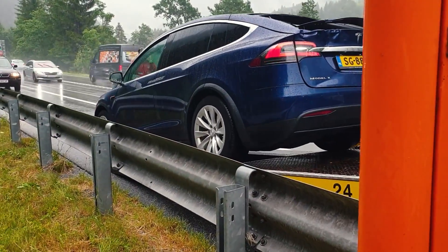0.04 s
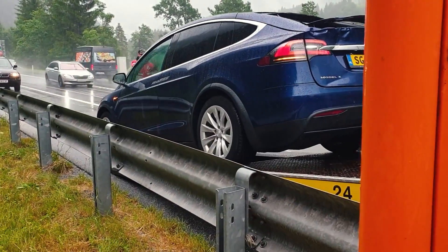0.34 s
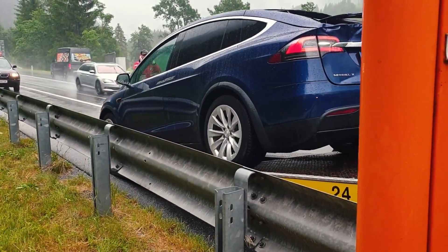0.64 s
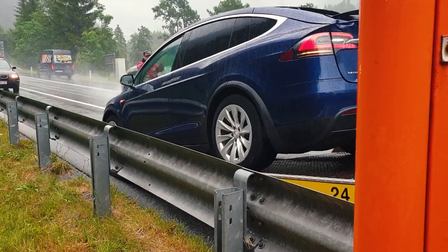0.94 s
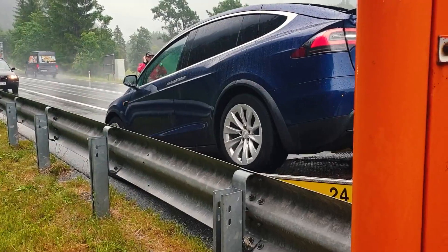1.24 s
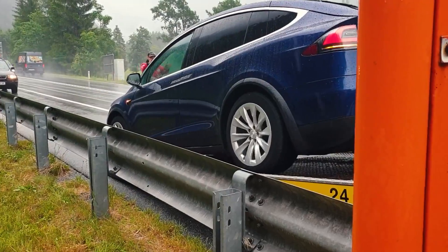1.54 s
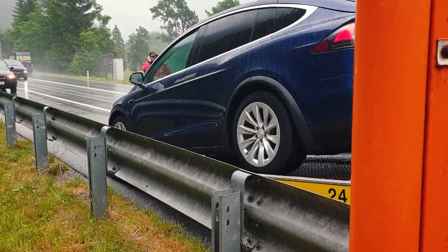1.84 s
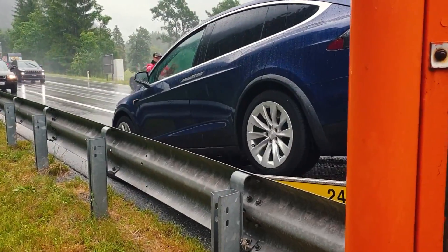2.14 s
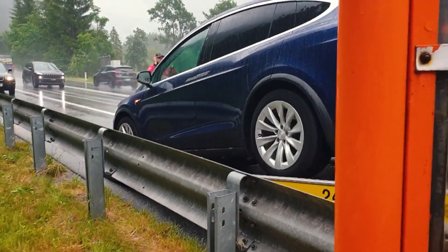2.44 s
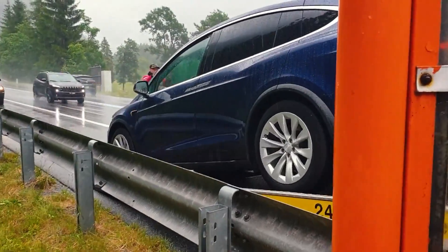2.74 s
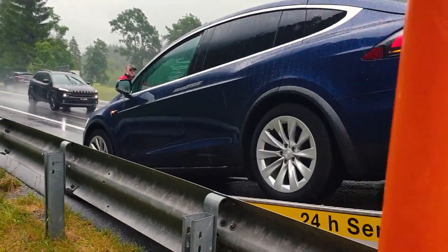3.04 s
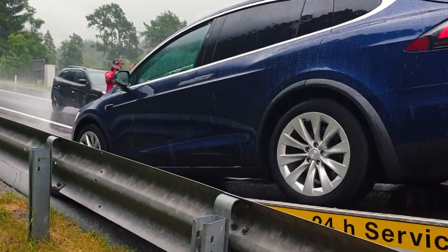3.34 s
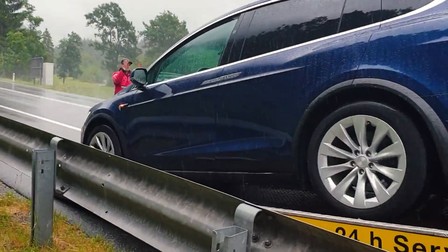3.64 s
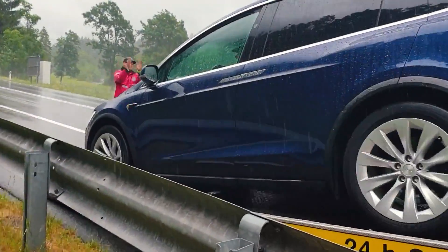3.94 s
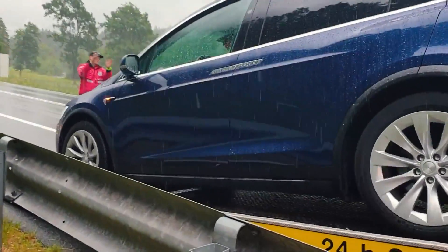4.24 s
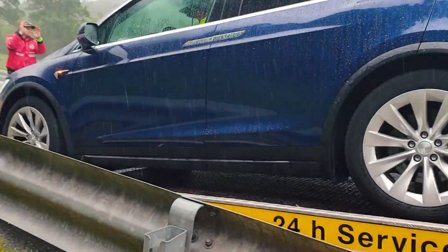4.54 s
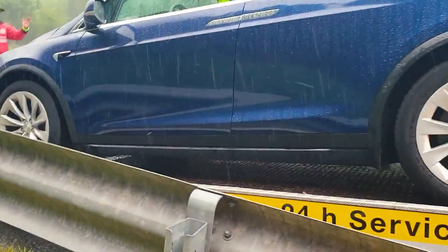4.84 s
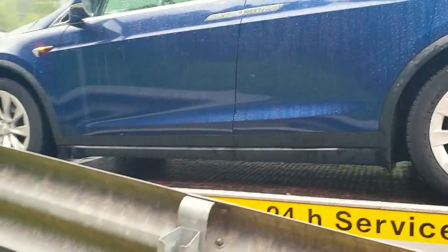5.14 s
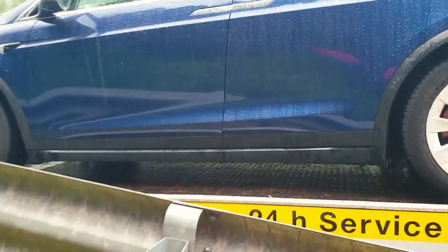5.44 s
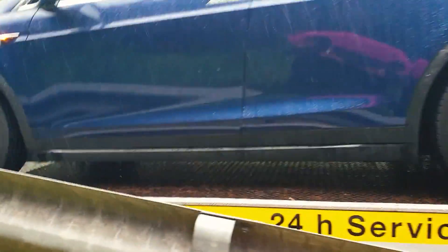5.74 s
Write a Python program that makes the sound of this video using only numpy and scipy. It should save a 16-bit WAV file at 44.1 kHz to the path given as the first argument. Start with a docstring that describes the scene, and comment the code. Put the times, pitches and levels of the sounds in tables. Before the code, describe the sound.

Tyre roar and hissing spray from a rain-wet highway run throughout, heard on a handheld phone at the roadside. Underneath, a diesel tow truck idles with a steady throb and hum over a deep traffic rumble. Cars swish past at about 0.6 and 1.5 seconds, their low engine drones swelling and sinking slightly in pitch. At 2 seconds a hand cups the microphone, and the hiss on the left turns hollow with a brief rising, whistling colour. A short bright swish comes at 3 seconds as another car passes. Near 3.5 seconds a finger clicks on the case and the hiss opens up again. The strongest pass sprays by just after 4 seconds, followed by a deep engine drone that peaks around 4.5 and falls away by 5. At about 5.4 seconds a soft knock on the case comes with a short, high tyre sizzle.

```python
"""Tyres roar and throw hissing spray on a rain-wet highway as cars pass, their engines droning by.
A tow truck idles on the shoulder, its diesel throbbing at 30 Hz over a deep traffic rumble.
The phone moves from behind a guard-rail post to a car's flank. Cavities in the hand around it colour
the left port and retune as the grip shifts; a finger clicks and knocks on the case."""
import sys
import numpy as np
from scipy import signal
from scipy.fft import rfft, irfft
from scipy.io import wavfile
from scipy.ndimage import uniform_filter1d

SR = 44100
rng = np.random.default_rng(int(sys.argv[2]) if len(sys.argv) > 2 else 0)


def persist_wave(psi):
    """Save psi, clipped to +-1, as 16-bit WAV."""
    counts = np.round(np.clip(psi, -1, 1) * 32767).astype(np.int16)
    wavfile.write(sys.argv[1], SR, np.atleast_2d(counts).T)


N = 254898
TIME = np.arange(N) / SR
FRAME = 1024
BIN_HZ = np.arange(FRAME // 2 + 1)[:, None] * SR / FRAME + 1e-3


def wet_road(flutter_db=0.97, shade_db_per_db=0.096, hiss_dip_db=-3.5):
    """Tyre roar and spray; the phone's body shades the left port from near spray."""
    t, _ = short_spectra(TIME)
    spray_db, roar_db, sizzle_db = traffic(t)
    spray_db = spray_db + flutter_db * np.interp(t, TIME, walk(14))
    roar = tyre_roar(t, roar_db, sizzle_db) * road_noise(t, grain_db=1.0)
    hiss = spray(spray_db) * road_noise(t, grain_db=0.74)
    left, right = asphalt_echo(t) * (roar + hiss)
    treble = np.interp(BIN_HZ, [3000, 5000], [0, 1])
    shade = undb(-shade_db_per_db * spray_db * treble * (1 - cupping(t)))
    # The right channel's hiss dulls around 5 kHz from 2 to 3.5 s.
    hiss_dip = undb(hiss_dip_db * covering(t) * resonance(BIN_HZ, 5000, 1300))
    return signal.istft(np.array([left * shade * hand(t), right * hiss_dip]), SR)[1][:, :N]


# Passing cars: nearest_s, spray_gain_db, roar_gain_db, sizzle_gain_db, sizzle_hz, approach_s, retreat_s
CARS = [(0.62, 2.5, -7, 0.5, 4600, 0.38, 0.25), (1.55, 3, -18, -4, 3000, 0.2, 0.2),
        (3.17, 4, -7.5, -3.5, 2750, 0.33, 0.25), (4.14, 6.5, -1, 4, 2970, 0.21, 0.15),
        (5.39, -9, -20, 9, 7640, 0.039, 0.14)]

def traffic(t, roar_lag_s=0.15, linger=1.6, sizzle_width_hz=1760):
    """Spray, roar and sizzle gains in dB; tyres are loudest from behind and outlast their spray."""
    spray_power, roar_power, sizzle_power = undb([-8, -2, -1.5]) ** 2  # far traffic
    for at, spray_db, roar_db, sizzle_db, sizzle_hz, approach, retreat in CARS:
        spray_power += undb(spray_db) ** 2 * swell(t, at, approach, retreat)
        roar_power += undb(roar_db) ** 2 * swell(t, at + roar_lag_s, approach, retreat * linger)
        tread = undb(sizzle_db) ** 2 * resonance(BIN_HZ, sizzle_hz, sizzle_width_hz)
        sizzle_power = sizzle_power + tread * swell(t, at, approach, retreat * linger)
    return [10 * np.log10(power) for power in (spray_power, roar_power, sizzle_power)]


def swell(t, at, approach_s, retreat_s):
    """Tyre noise power of one pass, 1 at its peak."""
    return resonance(t, at, 2 * np.where(t < at, approach_s, retreat_s))


# Base roar spectra, behind the post and beside the car: freq_hz, density_db
ROAR_BEHIND = [(100, -77.5), (300, -74.5), (420, -77.5), (560, -74.5), (690, -70.5), (770, -72.5),
               (870, -74), (1130, -72.5), (1700, -74.5), (2300, -77.5), (3300, -80.5), (4500, -87.5),
               (8000, -100)]
ROAR_BESIDE = [(100, -99), (190, -68.5), (280, -70.5), (420, -81.5), (540, -77.5), (840, -72),
               (1220, -76.5), (1480, -75), (1720, -78), (2060, -76.5), (2600, -81), (3400, -81),
               (4500, -85.5), (5200, -82), (6300, -92), (8000, -100)]

def tyre_roar(t, roar_db, sizzle_db):
    """Spectrum of rolling tyres: roar below, tread sizzle above."""
    beside = beside_car(t)
    colour = tone(ROAR_BEHIND, BIN_HZ) ** (1 - beside) * tone(ROAR_BESIDE, BIN_HZ) ** beside
    tread = np.interp(BIN_HZ, [1400, 3100], [0, 1])
    return colour * undb((1 - tread) * roar_db + tread * sizzle_db)


# Base spray spectrum: freq_hz, density_db
SPRAY_SPECTRUM = [(3500, -105), (4700, -92), (5300, -81.5), (6400, -77), (7800, -73.5), (8900, -79),
                  (10200, -75.5), (12100, -77), (12600, -84.5), (15600, -87)]

def spray(near_db):
    """Spectrum of flung water; the nearer the cloud, the more of its top survives the air."""
    reach = np.clip((BIN_HZ - 3500) / 7500, 0.1, 1.25)
    return tone(SPRAY_SPECTRUM, BIN_HZ) * undb(reach * near_db)


def road_noise(t, grain_db, alike_hz=900):
    """Grainy noise spectra at both ports; only the lows are alike, and they reach the left later."""
    noises = (rng.standard_normal(N) * undb(grain_db * walk(310)) for _ in range(2))
    right, unshared = (short_spectra(noise)[1] for noise in noises)
    alike = 1 / np.sqrt(1 + (BIN_HZ / alike_hz) ** 2)
    lag_s = np.interp(t, [2.5, 5], [0.32, 0.47]) / 1000
    left = alike * np.exp(-2j * np.pi * BIN_HZ * lag_s) * right + np.sqrt(1 - alike ** 2) * unshared
    return np.array([left, right])


def asphalt_echo(t, depth_db=1.5, delay_ms=2.4, drift=0.114):
    """An echo off the wet asphalt combs the hiss; the comb slides as the cars move."""
    lag_s = delay_ms / 1000 * (1 + drift * np.interp(t, TIME, walk(0.95)))
    return undb(depth_db * np.cos(2 * np.pi * BIN_HZ * lag_s))


# Diesel orders: firing_multiple, level_db
IDLE_ORDERS = [(1, -41), (1.5, -52.5), (2, -39.5), (2.5, -48), (3, -47.5), (4, -55.5), (4.5, -58), (5, -56),
               (7, -62)]
# Machinery hums: pitch_hz, behind_post_db, beside_car_db
MACHINE_HUMS = [(203, -57, -65), (248, -56.5, -57.5), (343.6, -64, -54.5), (420.7, -61.5, -62.5)]

def tow_truck(firing_hz=30.0, wander=0.002, uneven_db=1.5, waver_db=1.5):
    """A governed diesel idles: orders locked to the firings, half orders from unequal cylinders."""
    firings = np.cumsum(firing_hz * (1 + wander * walk(4.1))) / SR
    beside = beside_car(TIME)
    out = np.zeros(N)
    for order, db in IDLE_ORDERS:
        level = undb(db + uneven_db * np.log2(order) * walk(7))
        out += np.sqrt(2) * level * np.sin(2 * np.pi * order * firings)
    for hz, behind_db, beside_db in MACHINE_HUMS:
        level_db = behind_db + (beside_db - behind_db) * beside + waver_db * walk(5.4)
        out += partial(hz * firings / firing_hz, level_db)
    return out


# Passing engines: nearest_s, firing_hz, doppler_share, level_db, approach_s, retreat_s
ENGINES = [(0.1, 75.8, 0.015, -30, 0.34, 0.2), (0.8, 74.7, 0.0038, -37, 0.07, 0.4),
           (1.3, 60.6, 0.0074, -33.5, 0.19, 0.078), (1.53, 95, 0.01, -34, 0.02, 0.11),
           (1.82, 91.5, 0.0251, -30.5, 0.022, 0.12), (3.7, 208, 0.02, -44, 0.045, 0.063),
           (4.45, 47.11, 0.01197, -25.3, 0.57, 0.028), (4.6, 180.2, 0.036, -49, 0.1, 0.05),
           (4.88, 61.5, 0.01, -34, 0.27, 0.06)]

def passing_engine(at, firing_hz, doppler, level_db, approach_s, retreat_s, turn_s=0.36):
    """An exhaust drone swells with inverse distance and sinks in pitch as it goes by."""
    hz = firing_hz * (1 - doppler * np.tanh((TIME - at) / turn_s))
    cycles = np.cumsum(hz * (1 + 0.0038 * walk(5.7))) / SR
    db = level_db + 0.24 * walk(6.0)
    drone = partial(cycles, db) + partial(2 * cycles, db - 25) + partial(3 * cycles, db - 25) / 2
    distance = np.hypot(1, (TIME - at) / np.where(TIME < at, approach_s, retreat_s))
    return drone / distance


CUP_AT_S, CUP_CLOSE_S, KNOCK_AT_S = 2.013, 0.053, 5.355

def hand(t):
    """Left port response: cavities ring, and sound creeping round the hand cancels in a notch."""
    cup, beside = cupping(t), beside_car(t)
    gap_open = t > KNOCK_AT_S  # the finger leaves a gap that rings and admits treble
    gap_db = 4.5 * gap_open * resonance(BIN_HZ, 7600, 1100)
    treble_db = np.interp(beside, [0, 1], [-1.6, -7]) + 4.5 * covering(t) + 2.5 * gap_open
    tilt_db = treble_db * np.minimum(BIN_HZ / 11000, 1)
    tight = bell(t, 2.24, 0.38)  # the tightest grip partly fills the notch
    depth_db = np.interp(beside, [0, 1], [-20.5, -29]) + cup * (2 + 7 * tight)
    notch_db = depth_db * resonance(BIN_HZ, 8250, 1700)
    # Phase leads below the first cavity peak.
    lead_rad = np.interp(cup, [0, 1], [0.64, 0.87]) * bell(BIN_HZ, 1060, 1570)
    return undb(left_colour(t) + seal_whistle(t) + gap_db + notch_db + tilt_db) * np.exp(1j * lead_rad)


# Peaks and dips that colour the left hiss: centre_hz, width_hz, base_gain_db
FLAT_COLOUR = [(987, 300, -5.5), (2130, 590, 5.5), (5250, 700, 8.5), (6710, 1850, 9), (10700, 3100, -6.5),
               (14100, 3400, -2)]
CUPPED_COLOUR = [(2560, 610, 9), (3600, 1100, 5.5), (4770, 500, -3), (6370, 1340, 11.5), (10250, 1000, 5.5),
                 (11660, 1260, -11), (13600, 3000, 10.5)]  # with a slight dip near 4.8 kHz
# Hollow of the hand: time_s, tuning_ratio, cupped_ring_factor
GRIP = [(0, 0.95, 1), (1.9, 0.97, 1.04), (2.04, 0.84, 0.72), (2.16, 0.96, 1.0), (2.28, 1.08, 0.61),
        (2.5, 1.03, 0.95), (2.85, 0.995, 0.98), (3.1, 0.99, 1.15), (3.35, 0.94, 1.0), (3.58, 0.89, 0.92),
        (4.2, 0.97, 0.91), (5.1, 0.92, 1.2)]

def left_colour(t, ring_beside=0.41):
    """Peaks and dips in dB; the low ones retune with the grip and grow stronger by the car."""
    grip_s, *columns = np.transpose(GRIP)
    tuning, ring = (np.interp(t, grip_s, column) for column in columns)
    tuned_hz = BIN_HZ / tuning ** np.clip((10000 - BIN_HZ) / 3000, 0, 1)
    flat_db = sum(db * resonance(tuned_hz, hz, width) for hz, width, db in FLAT_COLOUR)
    cupped_db = sum(db * resonance(tuned_hz, hz, width) for hz, width, db in CUPPED_COLOUR)
    close = np.interp(t, [3.9, 4.15], [0, 1])
    flat_db *= 1 + ring_beside * close * np.interp(BIN_HZ, [2500, 4000], [1, 0])
    cup = cupping(t)
    return (1 - cup) * flat_db + cup * ring * cupped_db


def seal_whistle(t, start_hz=2390, rise_hz_per_s=1900, seal_s=0.017):
    """Boost in dB of two cavities that whistle upwards as the hand seals, fading as the seal leaks."""
    since = np.maximum(t - CUP_AT_S, 0)
    seal = np.minimum(since / seal_s, 1) * bell(since, 0, 0.19)
    hz = start_hz + rise_hz_per_s * since
    return seal * (15 * resonance(BIN_HZ, hz, 260) + 4.5 * resonance(BIN_HZ, 2.3 * hz, 500))


def covering(t, let_go_at_s=3.49, release_s=0.05):
    """Hand over the port, 0-1: a quick close, a quick release."""
    closed = np.clip((t - CUP_AT_S) / CUP_CLOSE_S, 0, 1)
    return closed * np.clip(1 - (t - let_go_at_s) / release_s, 0, 1)


def cupping(t, hold_s=0.52, loosen_per_s=0.81):
    """Cup of the covering hand, 0-1: a hold, then a slow loosening."""
    return covering(t) * np.clip(1 - loosen_per_s * (t - CUP_AT_S - CUP_CLOSE_S - hold_s), 0, 1)


def beside_car(t):
    """Phone position, from behind the post (0) to the car's flank (1)."""
    return np.interp(t, [2.9, 3.8], [0, 1])


# Case modes: pitch_hz, base_peak_db, t60_s
CLICK_MODES = [(2300, -42, 0.002), (5350, -30.5, 0.0042), (6650, -30, 0.0036), (10900, -39, 0.001)]
KNOCK_MODES = [(1170, -42.5, 0.009), (1600, -43, 0.007), (6800, -38, 0.003)]
# Finger clicks: start_s, gain_db
CLICKS = [(3.4614, -1), (3.464, 1.5)]

def finger_taps():
    """A finger clicks twice on the case as the hand lets go, and later knocks it softly."""
    clicks = sum(undb(db) * tap(at, CLICK_MODES, contact_s=0.0017, pan_db=13.5) for at, db in CLICKS)
    return clicks + tap(KNOCK_AT_S, KNOCK_MODES, contact_s=0.0079, pan_db=0)


def tap(at, modes, contact_s, pan_db):
    """A short scuffing contact sets the case's modes ringing."""
    t = np.arange(4096) / SR
    contact = rng.standard_normal(len(t)) * np.exp(-t / contact_s)
    out, start = np.zeros(N), int(at * SR)
    for hz, db, t60 in modes:
        mode = t * np.sin(2 * np.pi * hz * t) * np.exp(-np.log(1000) * t / t60)
        ring = signal.fftconvolve(contact, mode)[:len(t)]
        out[start:start + len(t)] += undb(db) * ring / np.abs(ring).max()
    return out * pan(pan_db)


# Bright swishes: peak_s, level_db, centre_hz, width_hz, half_width_s, left_minus_right_db
SWISHES = [(0.507, -46, 12400, 4530, 0.032, -9), (2.176, -48, 12300, 4500, 0.07, 14),
           (2.38, -46, 12700, 3520, 0.17, 5), (3.012, -37, 13200, 4200, 0.04, -3),
           (3.023, -45, 13400, 3400, 0.1, 9)]

def swishes(size=32768):
    """Brief swells of bright hiss, each with its own colour and side."""
    out, hz = np.zeros((2, N)), np.arange(size // 2 + 1) * SR / size
    for at, db, centre_hz, width_hz, half_width_s, pan_db in SWISHES:
        span = int(at * SR) - size // 2 + np.arange(size)
        burst = irfft(rfft(rng.standard_normal((2, size))) * bell(hz, centre_hz, width_hz))
        envelope = undb(db) * bell(TIME[span], at, 2 * half_width_s)
        out[:, span] += burst / burst.std() * envelope * pan(pan_db)
    return out


# Tread-block notes of far tyres: pitch_hz, base_level_db
TREAD_NOTES = [(655, -59), (692, -57.5), (742, -57)]

def tread_hum(drift=0.00699, jitter=0.02, waver_db=2.5, swell_db=2):
    """Tread blocks sing unsteadily and swell as a car nears; the car's flank then screens them."""
    notes = np.zeros(N)
    for hz, db in TREAD_NOTES:
        cycles = np.cumsum(hz * (1 + drift * walk(1.5) + jitter * walk(30))) / SR
        notes += partial(cycles, db + waver_db * walk(9))
    return notes * undb(swell_db * bell(TIME, 2.6, 1.2)) * np.sqrt(1 - beside_car(TIME))


# Base rumble spectrum: freq_hz, density_db
RUMBLE_SPECTRUM = [(20, -83), (38, -60), (52, -52.5), (65, -48.5), (82, -56.5), (105, -63.5), (160, -67),
                   (270, -75), (400, -84), (700, -95.5)]

def rumble(gain_db=-1.5, wake_db=3, wake_lag_s=0.56, wake_s=0.44):
    """Deep roll of traffic and moving air; it swells as each car's wake reaches the verge."""
    hz = np.arange(1, N // 2 + 2) * SR / N
    wakes = sum(bell(TIME, at + wake_lag_s, wake_s) for at, *_ in CARS)
    roll = irfft(rfft(rng.standard_normal(N)) * tone(RUMBLE_SPECTRUM, hz), N)
    return roll * undb(gain_db + wake_db * wakes)


def undb(db):
    """Decibels to gain."""
    return 10 ** (np.asarray(db) / 20)


def pan(db):
    """Left and right gains, db apart."""
    return undb(np.array([[db], [-db]]) / 2)


def tone(points, hz):
    """Gain that gives white noise this spectrum."""
    points_hz, db = np.transpose(points)
    return undb(np.interp(np.log(hz), np.log(points_hz), db)) * np.sqrt(SR / 2)


def bell(x, centre, width):
    """Gaussian peak; width is the full width at half height."""
    return 2 ** (-(2 * (x - centre) / width) ** 2)


def resonance(x, centre, width):
    """Peak with long skirts; width is the full width at half height."""
    return 1 / (1 + (np.sqrt(2) - 1) * (2 * (x - centre) / width) ** 2) ** 2


def walk(rate_hz):
    """Smooth random drift with a spread of 1."""
    count = int(8 * rate_hz * N / SR) + 8
    drift = uniform_filter1d(uniform_filter1d(rng.standard_normal(count), size=3), size=3)
    return np.interp(TIME, np.linspace(0, N / SR, count), (drift - drift.mean()) / drift.std())


def partial(cycles, rms_db):
    """A sine that follows a count of cycles from a random phase."""
    return np.sqrt(2) * undb(rms_db) * np.sin(2 * np.pi * (cycles + rng.random()))


def short_spectra(x):
    """Frame times and short-time spectra."""
    return signal.stft(x, SR, nperseg=FRAME)[1:]


def scene(bass_left_db=-1.95, bass_right_db=-0.44, bass_lag_ms=0.296):
    """Road hiss over the engines, whose long waves are alike at both ports, later on the left."""
    bass = rumble() + tow_truck() + tread_hum() + sum(passing_engine(*row) for row in ENGINES)
    late_bass = np.interp(TIME - bass_lag_ms / 1000, TIME, bass)
    stereo_bass = np.array([late_bass * undb(bass_left_db), bass * undb(bass_right_db)])
    return finger_taps() + wet_road() + swishes() + stereo_bass


def record(dry):
    """The phone cuts steeply above 15.8 kHz."""
    return signal.sosfilt(signal.ellip(12, 0.1, 90, 15800, fs=SR, output="sos"), dry)


dry = scene()
out = record(dry)
persist_wave(out)
```